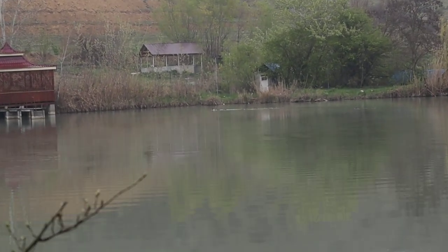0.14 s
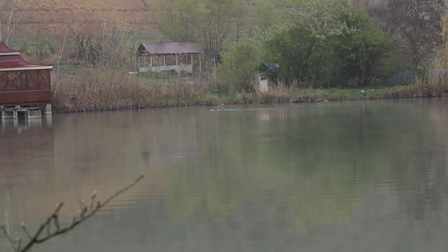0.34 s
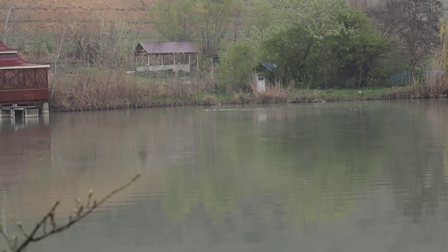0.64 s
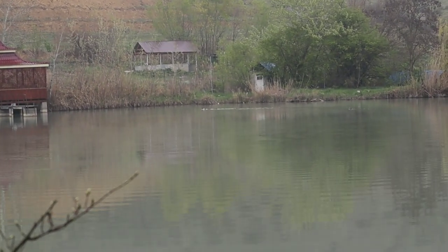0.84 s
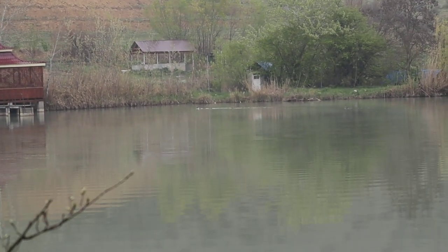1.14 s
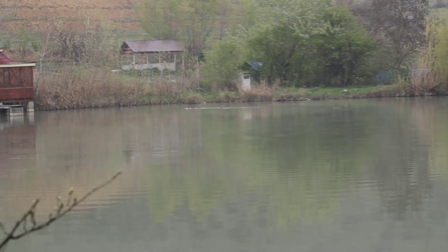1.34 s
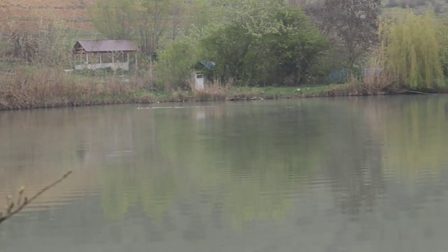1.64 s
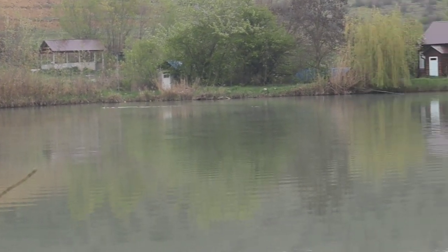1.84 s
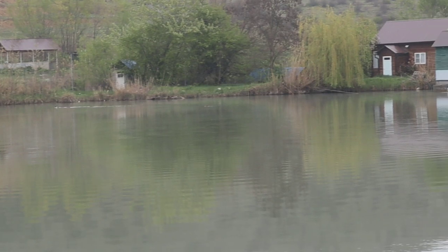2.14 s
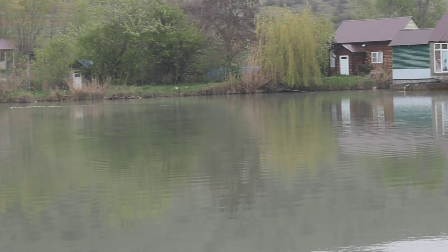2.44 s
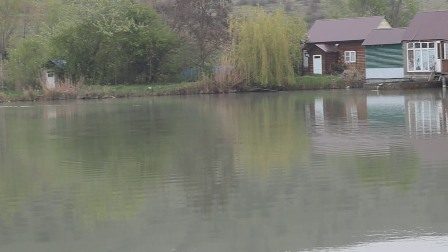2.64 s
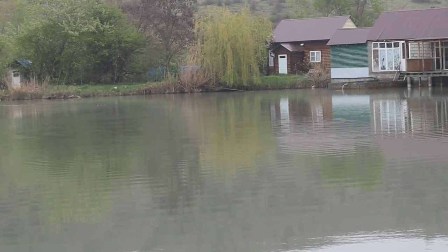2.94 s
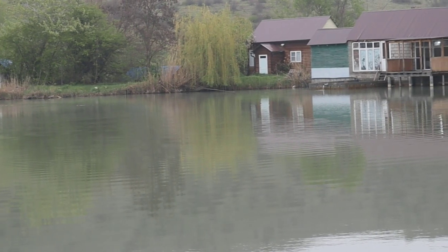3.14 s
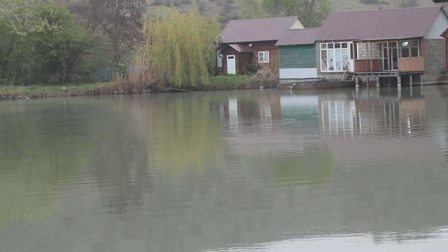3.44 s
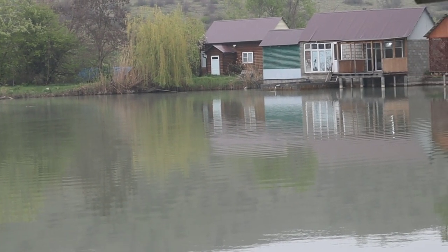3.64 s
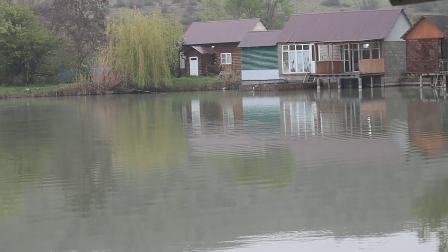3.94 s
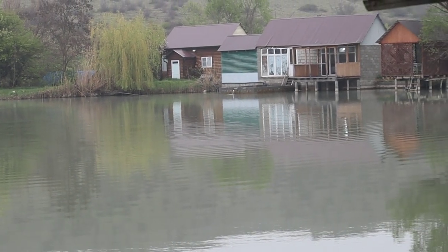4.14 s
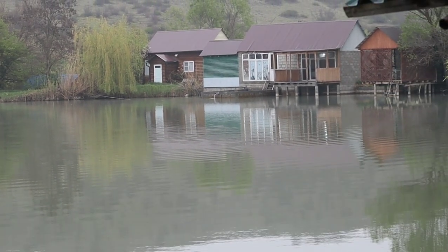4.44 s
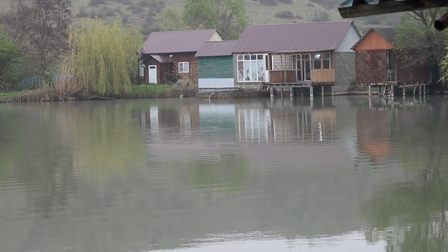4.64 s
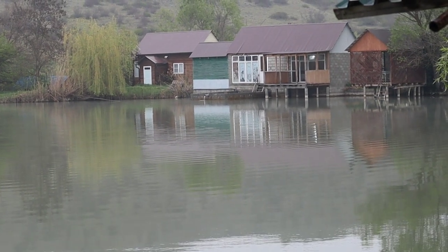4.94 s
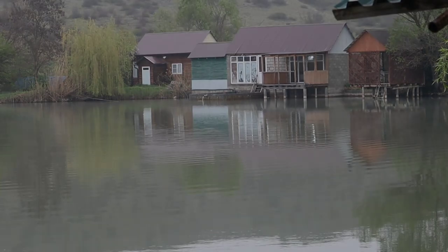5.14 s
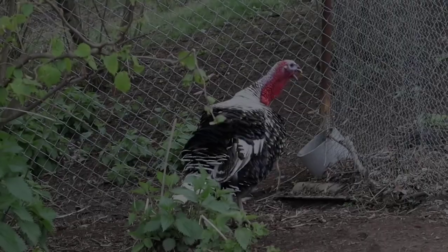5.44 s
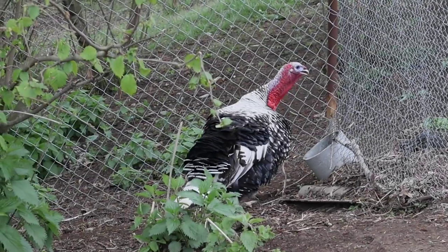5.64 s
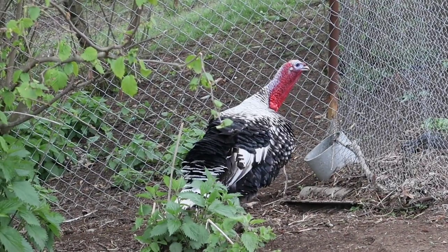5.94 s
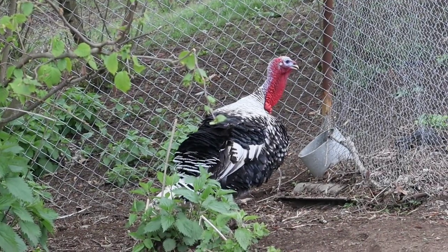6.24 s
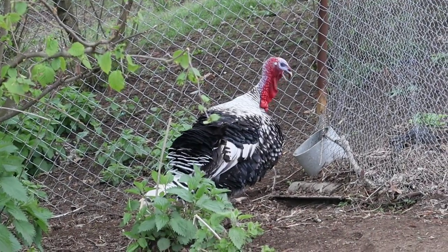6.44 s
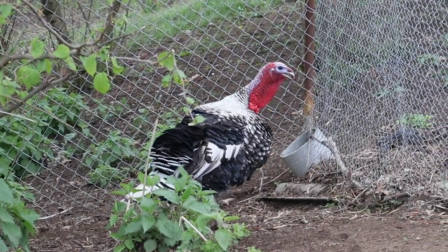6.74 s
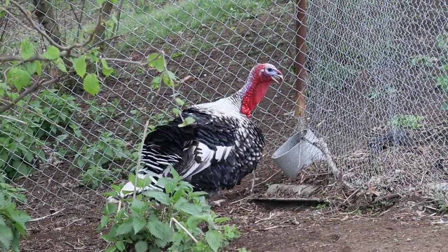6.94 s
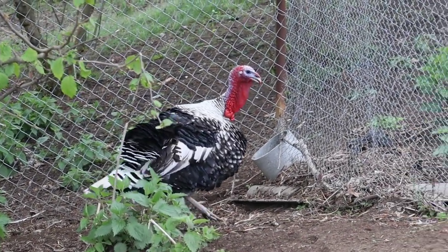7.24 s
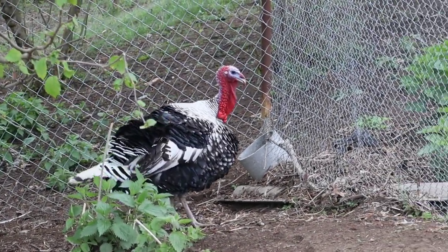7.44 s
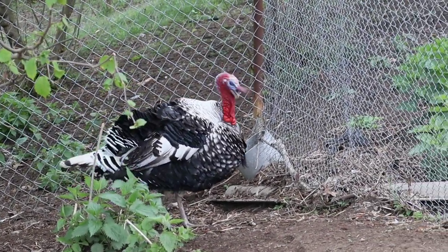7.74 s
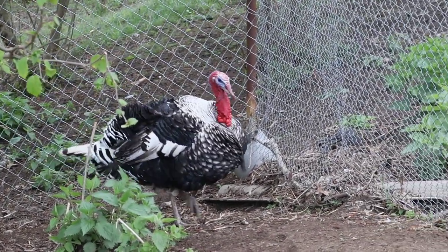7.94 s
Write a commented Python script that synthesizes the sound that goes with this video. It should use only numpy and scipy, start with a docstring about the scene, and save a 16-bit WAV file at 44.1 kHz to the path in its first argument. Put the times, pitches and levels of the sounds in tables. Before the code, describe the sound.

For the first five seconds a quiet pond is heard: soft steady hiss and a light, low wind rumble. Four faint, hoarse bird squawks carry across the water in the first second, with a soft microphone bump at 0.3 seconds. Two more squawks come between 3.2 and 3.7 seconds, and tiny high chirps are scattered throughout. From 4.7 seconds a distant songbird gives a few chips and fluted notes while the pond fades out. At 5.4 seconds a turkey starts gobbling close by in an outdoor pen, far louder than everything else: rapid throaty rattles mixed with reedy yelps and falling whistles. It slows to separate clucks around 6.2 seconds, peaks in a warble from 6.4 to 7, and ends by 7.2, with a faint yard echo. Quiet air remains until 8 seconds, with soft wind puffs and two faint ticks of dry litter.

```python
"""A quiet pond with far birds and light wind fades out; then a turkey gobbles close by in a wire pen.
The gobble has two voices: a gliding whistle of the syrinx, and a rattle of slack membranes that flap
in short bursts and ring the windpipe. The yard echoes faintly; dry litter ticks, small birds chip."""
import sys
import numpy as np
from scipy import signal
from scipy.fft import rfft, irfft, next_fast_len
from scipy.io import wavfile
from scipy.ndimage import uniform_filter1d

SR = 44100
rng = np.random.default_rng(int(sys.argv[2]) if len(sys.argv) > 2 else 0)


def waveform_to_disk(signal):
    """Save audio, clipped to [-1, 1], as 16-bit WAV at the path in sys.argv[1]."""
    frames = np.transpose(np.atleast_2d(signal))
    scaled = np.clip(frames, -1, 1) * 32767
    samples = np.round(scaled).astype(np.int16)
    wavfile.write(sys.argv[1], SR, samples)


N = 357121
T = np.arange(N) / SR
TOP_HZ = 15850


def turkey():
    """Both voices; ground and fence answer at once, the yard more faintly."""
    voice = dives() + notes() + cries() + rattles()
    fence = echo(voice, t60_s=0.07, wet_db=-19, dull_hz=5000, gap_s=0.009)
    yard = echo(voice, t60_s=0.52, wet_db=-25.5, dull_hz=4050, gap_s=0.019)
    return voice + puff(voice) + fence + yard


def rattles():
    """Bursts of rattle, the slowest heard as clucks."""
    # t/s, length/s, flap rate/Hz, level/dB, mouth re throat/dB, rasp/dB, rasp treble/dB, neck tuning/ratio
    bursts = [ (5.404, 0.04, 741, -38, -1, -3, 4, 0.99), (5.463, 0.029, 703, -29.5, 3, -2.5, 2.5, 1.04),
              (5.640, 0.03, 692, -26, -2, -3.5, 0, 1.04), (5.696, 0.022, 650, -22, -8, -5.5, -3, 1.04),
              (5.777, 0.037, 482, -16, 6.5, -11, -12, 1.03), (5.8, 0.03, 698, -21.5, -4, -2.5, -1.5, 0.93),
              (5.857, 0.031, 670, -20, -1.5, -7, -1, 0.97),
              (5.907, 0.028, 603, -24.5, 18, -7.5, -1.5, 1.18),
              (5.984, 0.057, 502.5, -18.5, 5, -18, -3, 1.04), (6.005, 0.03, 706, -22, -9, -2, 3.5, 1.01),
              (6.061, 0.036, 447, -25, 6, -13, 2, 1.01), (6.090, 0.029, 520, -33, 15, -0.5, 0, 1.02),
              (6.162, 0.035, 335.5, -23.5, -8, -10.5, -2.5, 1.01),
              (6.286, 0.034, 362.8, -21.5, -3.5, -10.5, -5, 0.99),
              (6.422, 0.032, 339.8, -19, 0.5, -12, -6, 1.01), (6.438, 0.026, 538, -12.5, 20, -17, -9, 1.03),
              (6.469, 0.015, 522, -22, 8, -19, -6, 1.15), (6.548, 0.047, 424, -23, 17, -11, -3, 1.09),
              (6.586, .040, 534.3, -12, 10, -7.5, 1, .98), (6.612, .060, 276.4, -16.5, -1, -3, -0.5, 1.02),
              (6.663, 0.017, 546, -21, -14, -12, 3, 0.99), (6.699, 0.018, 721, -17, -2, -5, 2.5, 1.03),
              (6.749, 0.022, 600, -18.5, -4.5, -3.5, -1.5, 1.02),
              (6.845, 0.035, 321, -28.5, -5, -12.5, -3, 0.93), (6.917, 0.017, 537, -18, 5, -31, -6, 1.06),
              (6.936, 0.025, 641, -12.5, 0, -12.5, -8, 0.98), (6.959, 0.023, 521, -14, 17, -12, -1.5, 0.99),
              (7.113, 0.027, 309, -32, -13, -13, -14, 1.06), ]
    out = np.zeros(N)
    for start, length, hz, db, *colour in bursts:
        add(out, start, undb(db) * rattle(length, hz, *colour))
    return out


def rattle(length_s, flap_hz, mouth_db, rasp_db, treble_db, neck, sag=0.11, scatter_db=7.5):
    """Slack membranes flap unevenly and slow down; each flap rings the airway and lets out air."""
    # airway resonances: f/Hz, width/Hz, level/dB
    throat_modes = [(88, 42, -11), (285, 35, 5), (542, 77, 10), (703, 84, -1)]
    mouth_modes = [(1056, 230, -6.5), (1510, 450, -35), (1786, 55, -9.5)]
    windpipe_modes = [(2063, 420, 11.5), (2940, 190, 9), (3544, 145, 11), (4343, 63, 5.5), (4890, 150, 5.5),
                      (5720, 200, -6.5), (6360, 370, -6.5), (8080, 1080, -13), (12500, 1300, -21.5)]
    # steady when slow or locked to the windpipe, chaotic between: flap rate/Hz, jitter/ratio
    chaos = [(360, .025), (520, .06), (690, .035)]
    t, effort = swell(length_s, attack=0.32, release=0.33)
    n = len(t)
    hz = flap_hz * (1 - sag * t / length_s)
    jitter = np.interp(hz, *np.transpose(chaos)) * wander(n, 400)
    cycle = np.cumsum(hz * (1 + jitter)) / SR
    flaps = np.diff(np.floor(cycle), prepend=-1) * undb(scatter_db * wander(n, 600))
    flaps += 0.03 * rng.standard_normal(n) * np.exp(-(cycle % 1) / 0.25)  # breath
    # fast flaps lock into a clear tone; slow ones ring a hollow, slack throat
    tone = np.interp(flap_hz, (565, 660), (0, undb(-1))) * np.sqrt(2) * np.cos(2 * np.pi * cycle)
    gulp = np.interp(flap_hz, (367, 554), (undb(4), 1e-9)) * ring(flaps, [(800, 370, 0)], neck)
    throat = unit(ring(flaps, throat_modes, neck) - tone - gulp)
    opening = undb(mouth_db)
    body = (throat + opening * ring(flaps, mouth_modes, neck)) / np.hypot(1, opening)
    rasp = undb(rasp_db) * ring(windpipe(flaps, neck), windpipe_modes, neck)
    dull = signal.sosfiltfilt(signal.butter(4, 4000, fs=SR, output="sos"), rasp)
    rasp = dull + undb(treble_db) * (rasp - dull)  # soft closures lack the top
    return body * effort + rasp * effort ** 1.74


def ring(pulses, modes, neck):
    """Pulses ring resonances tuned by the neck; output held at even strength."""
    y = sum((-1) ** k * undb(db) * double_band(pulses, hz * neck, 2 * width)
            for k, (hz, width, db) in enumerate(modes))
    size = SR // 150
    power = uniform_filter1d(uniform_filter1d(y ** 2, size), size)
    return y / np.sqrt(np.abs(power) + np.mean(y ** 2) / 1000)


def windpipe(pulses, neck, spacing_hz=718, reflection=0.55):
    """Pulses run up and down the long pipe, which rings on evenly spaced overtones."""
    trip = SR / (spacing_hz * neck)
    whole, part = int(trip), trip % 1
    back = reflection * np.array([1 - part, part])
    return signal.lfilter([1], np.r_[1, np.zeros(whole - 1), -back], pulses)


def whistle(hz, gain, octave_db, overtones_db, fray_rad):
    """Syrinx tone; overtones are strong when the membranes close hard, frayed when they close weakly."""
    # envelope of harmonics 3-20: f/Hz, level/dB
    overtones = [(2300, 0), (3100, 3.5), (4500, -5.5), (7500, -21.5), (8700, -16.5), (11000, -35.5)]
    n = len(hz)
    phase = turns(hz * (1 + 0.006 * wander(n, 500)))
    k = np.arange(3, 21)[:, None]
    weight = undb(spectrum_db(overtones, k * hz)) * (k * hz < TOP_HZ)
    shake = fray_rad * wander(n, 1100) / (1 + undb(overtones_db) ** 2)
    upper = np.sum(weight * np.sin(k * (phase + shake) + k ** 2), axis=0)
    upper /= np.sqrt(np.sum(weight ** 2, axis=0) + 0.1)
    tone = np.sin(phase) + undb(octave_db) * np.sin(2 * phase + shake / 2) + undb(overtones_db) * upper
    return np.sqrt(2) * tone * gain


def dives(rise_s=0.006, decay_s=0.0055, landing=0.8, ceiling_hz=2680, wobble=0.051):
    """The whistle drops steeply and unsteadily, loudest just before it levels out."""
    # peak t/s, f at peak/Hz, fall time/s, level/dB
    drops = [(5.405, 1270, 0.01, -38.5), (5.467, 1204, 0.0055, -28.5), (5.638, 1190, .011, -25.5),
             (5.693, 1225, 0.0072, -23), (5.860, 1072, .016, -22), (5.913, 1188, 0.0072, -18.5),
             (6.064, 1110, 0.01, -23.5), (6.694, 1340, .03, -18), (6.748, 1206, .005, -18)]
    out = np.zeros(N)
    t = np.arange(-0.02, 0.025, 1 / SR)
    envelope = signal.windows.tukey(len(t)) / np.cosh(t / np.where(t < 0, rise_s, decay_s))
    lowpass = signal.butter(4, 4500, fs=SR, output="sos")
    for peak_s, hz, fall_s, db in drops:
        gain = envelope * undb(2 * wander(len(t), 600))
        pitch = np.minimum(hz * (landing + (1 - landing) * np.exp(-t / fall_s)), ceiling_hz)
        pitch *= 1 + wobble * wander(len(t), 700)
        tone = whistle(pitch, gain, octave_db=-12.5, overtones_db=-11.5, fray_rad=0.45)
        add(out, peak_s + t[0], undb(db) * signal.sosfilt(lowpass, tone))
    return out


def notes():
    """Short gliding whistles of the syrinx."""
    # t/s, length/s, f/Hz, glide/(oct/s), level/dB, octave re fundamental/dB
    glides = [(5.482, 0.012, 1103, 7, -26.5, -12), (5.492, 0.025, 1350, -13, -23, -9),
              (6.092, .028, 2040, 7.5, -28, -12), (6.576, 0.025, 1029, 0, -13.5, -19),
              (6.618, 0.056, 1089, 1.1, -14, -32), (6.708, 0.017, 1107, -9, -23, -25),
              (6.979, .032, 1474, -0.3, -16.5, -11.5), (7.159, 0.048, 1336, 3.5, -27, -14)]
    out = np.zeros(N)
    for start, length, hz, glide, db, octave_db in glides:
        t, effort = swell(length, attack=0.19, release=0.38)
        pitch = hz * 2 ** (glide * t)
        add(out, start, whistle(pitch, undb(db) * effort, octave_db, overtones_db=-26, fray_rad=0.3))
    return out


def cries(edge_s=0.002):
    """Two longer, reedy cries of the syrinx."""
    # contours: t/s, f/Hz, fundamental/dB, octave re fundamental/dB, overtones re fundamental/dB
    yelp = [(5.514, 685, -25, -9, -6), (5.522, 732, -38, 11, 4.5), (5.537, 743, -29.5, 10.5, 10),
            (5.576, 808, -37, 4.5, 11.5), (5.59, 754, -30, -5, 1.5), (5.611, 616, -34.5, -22, -1)]
    warble = [(6.477, 836, -23.5, -8, -21), (6.495, 921, -17.5, -4.5, -11.5), (6.51, 767.5, -24, 11, -5),
              (6.532, 895, -21.5, 3, -5), (6.547, 792, -21, 8.5, -1), (6.557, 852, -24.5, 7, -11),
              (6.573, 854, -17, -2, -14), (6.586, 1000, -12, -14, -16)]
    out = np.zeros(N)
    for cry in yelp, warble:
        times, *columns = np.transpose(cry)
        t = np.arange(times[0] - 0.001, times[-1] + 0.003, 1 / SR)
        gate = np.clip(np.minimum(t - t[0], t[-1] - t) / edge_s, 0, 1)
        hz, db, octave_db, overtones_db = (np.interp(t, times, column) for column in columns)
        add(out, t[0], whistle(hz, undb(db) * gate, octave_db, overtones_db, fray_rad=0.14))
    return out


def puff(voice):
    """Air pushed out with the voice flutters low under it."""
    strength = np.sqrt(np.abs(uniform_filter1d(voice ** 2, SR // 60)))
    flutter = unit(double_band(rng.standard_normal(N), hz=84, width_hz=41))
    return undb(-41.5) * flutter * strength ** 0.55


def far_birds(droop=0.027, waver=0.0063):
    """Squawks and a songbird's fluted notes from across the water."""
    # t/s, length/s, level/dB
    squawks = [(0.124, 0.11, -47.5), (0.365, 0.19, -45.5), (0.668, 0.16, -44), (0.972, 0.13, -44),
               (3.199, 0.1685, -41.5), (3.564, 0.15, -41.5)]
    # t/s, length/s, f/Hz, glide/(oct/s), level/dB
    flutes = [(4.865, 0.029, 2450, 1, -46.5), (4.881, 0.19, 1961, -1, -40.5),
              (5.135, 0.1, 3230, 0.42, -39.5), (5.212, 0.074, 2690, 1.5, -41.5)]
    out = np.zeros(N)
    for start, length, db in squawks:
        add(out, start, undb(db) * squawk(length))
    for start, length, hz, glide, db in flutes:
        t, effort = swell(length, attack=0.11, release=0.29)
        sag = droop * (1 - effort) * (t > 0)
        pitch = hz * 2 ** (glide * t) * (1 - sag + waver * wander(len(t), 204))
        add(out, start, np.sqrt(2) * np.sin(turns(pitch)) * undb(db) * effort)
    return out + echo(out, t60_s=0.51, wet_db=-11.5, dull_hz=3840, gap_s=0.008)


def squawk(length_s, pitch_hz=325, beak_hz=1970):
    """A hoarse call climbs, then breaks to a lower pitch, through beak and throat resonances."""
    u = np.linspace(0, 1, int(length_s * SR))
    climb = 0.2 * (u % 0.55 - 0.27)
    hz = pitch_hz * (1 + climb + 0.018 * wander(len(u), 250) + 0.015 * rng.standard_normal())
    flaps = np.diff(np.floor(np.cumsum(hz) / SR), prepend=0) + 0.03 * rng.standard_normal(len(u))
    beak = band(band(flaps, beak_hz, width_hz=300), beak_hz, width_hz=1200)
    throat = double_band(flaps, hz=1580, width_hz=700)
    tone = 0.98 * np.sin(6 * turns(hz)) * np.std(beak)  # harmonic 6 sings on the beak resonance
    envelope = np.minimum(1, np.minimum(14 * u, 4 * (1 - u)))
    return unit(beak + tone + u ** 0.3 * throat) * envelope


def small_birds(chip_s=0.036, chip_fall=0.25):
    """Thin, level peeps and short falling chips."""
    # t/s, length/s, f/Hz, level/dB
    peeps = [(6.31, 0.12, 4350, -55), (6.777, 0.13, 4570, -55), (7.138, 0.12, 6030, -55)]
    # t/s, starting f/Hz, level/dB
    chips = [(0.234, 7770, -45.5), (.275, 8000, -56), (0.351, 5380, -50), (1.66, 7860, -49.5),
             (2.35, 7600, -55), (3.785, 8200, -55), (4.67, 2890, -45.5), (4.72, 2730, -50),
             (4.77, 2270, -46), (4.945, 7920, -53), (7.058, 7840, -54)]
    out = np.zeros(N)
    for start, length, hz, db in peeps:
        n = int(length * SR)
        pitch = hz * (1 + 0.01 * wander(n, 500))
        add(out, start, undb(db) * np.sin(turns(pitch)) * np.hanning(n))
    u = np.linspace(0, 1, int(chip_s * SR))
    for start, hz, db in chips:
        pitch = hz * (1 - chip_fall * u + 0.05 * wander(len(u), 600))
        add(out, start, undb(db) * np.sin(turns(pitch)) * np.sin(np.pi * u))
    return out + echo(out, t60_s=0.51, wet_db=-2.5, dull_hz=9000, gap_s=0.0062)


def litter(decay_s=0.0035):
    """Twigs and dry litter crack in brief bursts of noise."""
    # t/s, centre f/Hz, peak level/dB
    ticks = [(2.812, 8600, -36), (7.436, 1500, -37), (7.948, 4000, -36)]
    out = np.zeros(N)
    t = T[:SR // 50]
    for start, hz, db in ticks:
        crack = band(rng.standard_normal(len(t)) * np.exp(-t / decay_s), hz, 0.76 * hz)
        add(out, start, undb(db) * crack / np.abs(crack).max())
    return out


def bumps():
    """Soft low swells and puffs of air on the microphone."""
    # centre t/s, f/Hz, length/s, level/dB
    swells = [(0.219, 275, .3, -52), (0.313, 258, 0.047, -33.5), (2.514, 28, 0.22, -45),
              (2.874, 25.8, .26, -40), (3.421, 26.9, 0.138, -40), (7.544, 24, 0.17, -36),
              (7.851, 30.1, 0.19, -39)]
    out = np.zeros(N)
    for middle, hz, length, db in swells:
        t = T[:int(length * SR)]
        tone = np.sqrt(2) * np.sin(2 * np.pi * hz * t)
        add(out, middle - length / 2, undb(db) * tone * np.hanning(len(t)))
    return out


def air(spectrum, level_db, drone_db):
    """Steady far hiss, gusting wind rumble and a faint wavering drone."""
    size = next_fast_len(N)
    hz = np.arange(size // 2 + 1) * SR / size
    shaped = rfft(rng.standard_normal(size)) * undb(spectrum_db(spectrum, hz)) * (hz > 20)
    noise = unit(irfft(shaped, size)[:N])
    rumble = signal.sosfiltfilt(signal.butter(2, 45, fs=SR, output="sos"), noise)
    drone = unit(double_band(rng.standard_normal(N), hz=270, width_hz=45))
    drone *= undb(drone_db + 2 * wander(N, 1))
    gusts = undb(3 * wander(N, 6))
    return undb(level_db) * (noise - rumble + rumble * gusts) + drone


def echo(x, t60_s, wet_db, dull_hz, gap_s):
    """Scattered outdoor reflections, dulled; soft ground swallows the lows."""
    t = T[:SR]
    tail = rng.standard_normal(SR) * undb(-60 * t / t60_s) * (t > gap_s)
    tail = signal.sosfilt(signal.butter(1, dull_hz, fs=SR, output="sos"), tail)
    tail = signal.sosfilt(signal.butter(1, 900, "high", fs=SR, output="sos"), tail)
    return undb(wet_db) * signal.fftconvolve(x, unit(tail) / np.sqrt(SR))[:N]


def swell(length_s, attack, release):
    """Time from mid-sound and effort envelope; attack and release are shares of the length."""
    u = np.linspace(0, 1, int(length_s * SR))
    rise, fall = np.clip(u / attack, 0, 1), np.clip((1 - u) / release, 0, 1)
    return (u - 0.5) * length_s, np.sin(np.pi / 2 * rise) * np.sin(np.pi / 2 * fall) ** 2


def band(x, hz, width_hz):
    """One resonance, gain 1 at centre."""
    return signal.lfilter(*signal.iirpeak(hz, hz / width_hz, fs=SR), x)


def double_band(x, hz, width_hz):
    """Two equal resonances in series."""
    return band(band(x, hz, width_hz), hz, width_hz)


def spectrum_db(points, hz):
    """Interpolate (f/Hz, level/dB) points over log frequency."""
    f, db = np.transpose(points)
    return np.interp(np.log(hz + 1), np.log(f), db)


def wander(n, rate_hz):
    """Smooth random drift, spread near 1."""
    k = int(SR / rate_hz)
    return uniform_filter1d(np.repeat(rng.standard_normal(n // k + 1), k), k)[:n]


def turns(hz):
    """Phase/rad of a moving pitch."""
    return 2 * np.pi * np.cumsum(hz) / SR


def undb(db):
    """dB to gain."""
    return 10 ** (np.asarray(db) / 20)


def unit(x):
    """Scale to rms 1."""
    return x / np.sqrt(np.mean(x ** 2) + 1e-18)


def add(out, start_s, x):
    """Mix x into out."""
    i = int(start_s * SR)
    out[i:i + len(x)] += x[:len(out) - i]


def scene():
    """The pond fades out, the pen fades in."""
    # air spectra: f/Hz, relative density/dB
    pond_air = [(11, -30), (18, 9), (38, -4.5), (59, -16), (264, -13), (440, -17.5), (1660, -22.5),
                (1970, -22.5), (4340, -26.5), (5600, -30.5), (7020, -31), (15500, -41.5)]
    pen_air = [(11, -33), (18, 10), (38, -17.5), (154, -25), (264, -21), (304, -26.5), (1320, -31),
               (3770, -35), (5600, -37), (15500, -44.5)]
    fade_out = np.interp(T, (4.915, 5.438), (1, 0)) ** 1.49
    fade_in = np.interp(T, (5.37, 5.78), (0, 1))
    pond = (air(pond_air, level_db=-45, drone_db=-62.5) + far_birds()) * fade_out
    pen = air(pen_air, level_db=-48.5, drone_db=-65.5) * fade_in
    return (pond + pen + turkey() + small_birds() + litter() + bumps())[None]


def record(dry):
    """Steep low-pass at TOP_HZ."""
    return signal.sosfilt(signal.ellip(10, 0.2, 80, TOP_HZ, fs=SR, output="sos"), dry)


dry = scene()
out = record(dry)
waveform_to_disk(out)
```